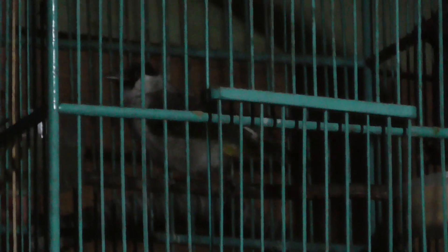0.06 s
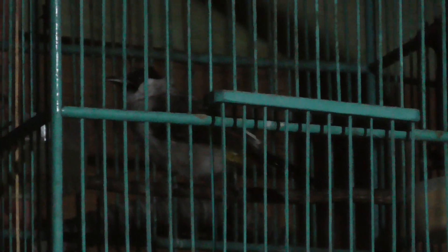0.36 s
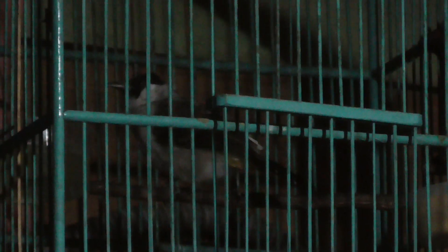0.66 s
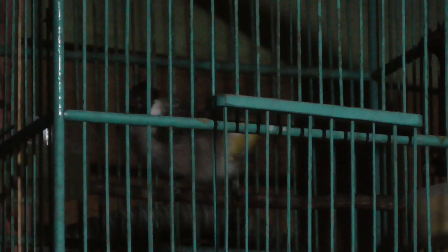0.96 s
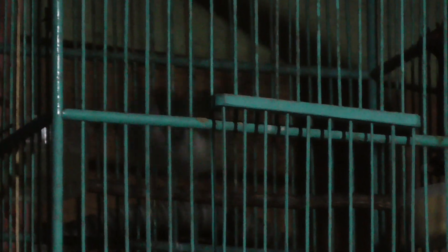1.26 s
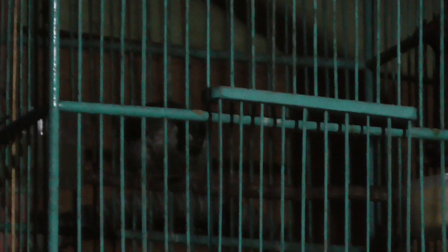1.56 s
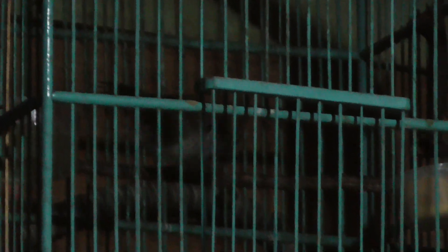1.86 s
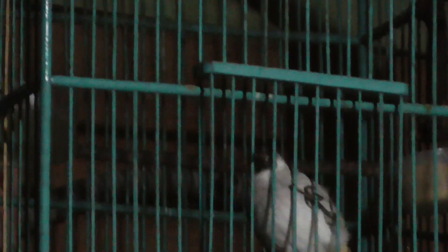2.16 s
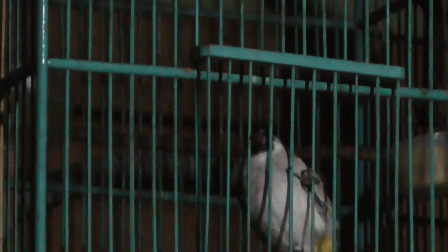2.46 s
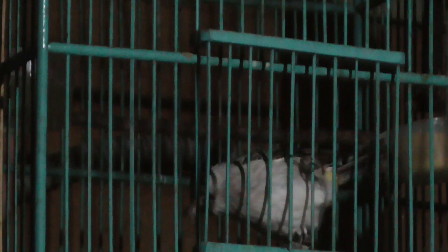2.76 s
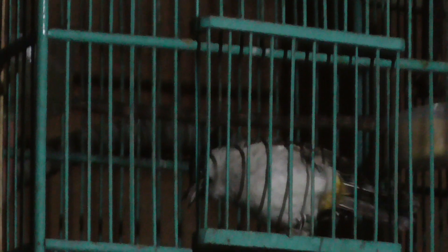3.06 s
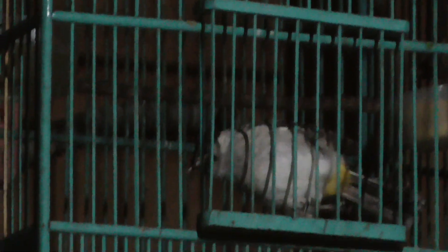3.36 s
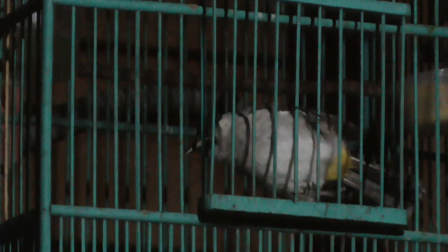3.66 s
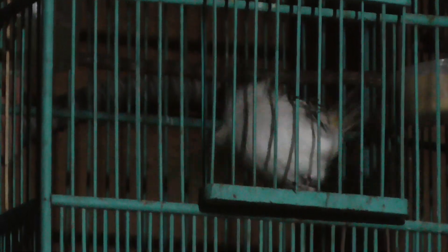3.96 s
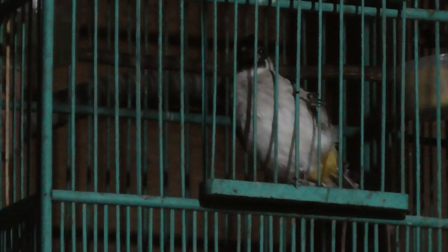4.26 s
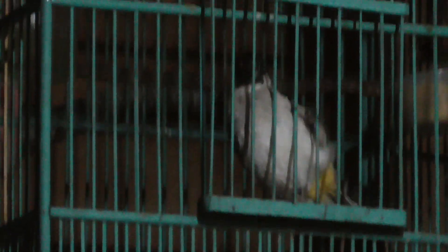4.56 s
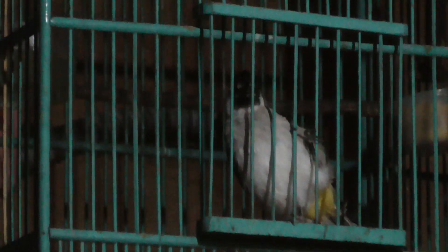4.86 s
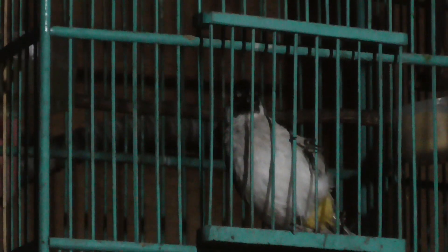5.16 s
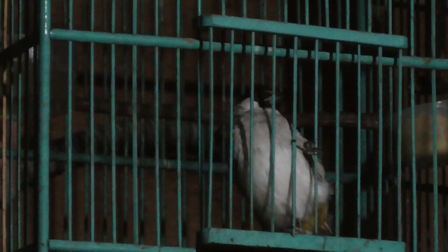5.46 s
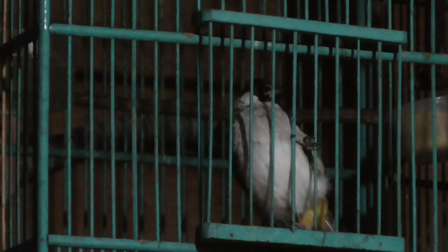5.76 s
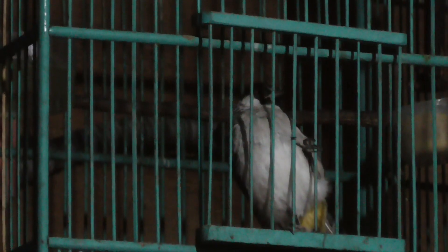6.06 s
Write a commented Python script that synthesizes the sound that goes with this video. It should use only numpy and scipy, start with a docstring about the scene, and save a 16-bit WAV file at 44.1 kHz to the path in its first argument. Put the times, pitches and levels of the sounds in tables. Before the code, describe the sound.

Sharp, raspy chirps from a bird hopping in its cage, with light bumps and faint far hoots behind.

```python
"""First comes a low room rumble with a thin hiss, then soft far hoots and a faint croaking chorus.
A claw ticks on a bar, and a caged bulbul starts to chatter in the small room at night. Each short, harsh
note is one push of air: a rasp that catches into a rising tone, shaped by the throat and beak.
The bird hops about, ticking and bumping the cage, and a few faint chirps come from farther away."""
import sys
import numpy as np
from scipy import signal
from scipy.fft import rfft, irfft, next_fast_len
from scipy.io import wavfile
from scipy.ndimage import map_coordinates

SR = 44100
rng = np.random.default_rng(int(sys.argv[2]) if len(sys.argv) > 2 else 0)


def transcribe(signal):
    """Save signal, clipped to [-1, 1], as a 16-bit WAV file at the path in sys.argv[1]."""
    frames = np.atleast_2d(signal).T
    limited = np.clip(frames, -1, 1)
    pcm = np.round(limited * 32767).astype(np.int16)
    wavfile.write(sys.argv[1], SR, pcm)


N = 269451

# The tone colour of the rumble and of the hiss. Each row: frequency in Hz, relative level in dB.
RUMBLE_COLOUR = [(20, -40), (55, -6), (105, -6), (150, -4.5), (270, -3.5), (370, -2), (480, -10),
                 (650, -12), (900, -15.5), (1500, -18.5), (2000, -27), (3000, -33)]
HISS_COLOUR = [(1500, -12.5), (2130, -7.5), (2370, 9.5), (2580, 0), (2800, -19.5), (4000, -16), (5200, -13),
               (6100, -2), (7200, -4), (7900, -13.5), (8800, -2.5), (11000, -14), (15500, -26)]
# How the deepest hum swells. Each row: time in seconds, level in dB.
HUM_LEVELS = [(0, -71), (2, -71.5), (4, -68.5), (5.2, -63), (6.1, -69.5)]
# The far hoots. Each row: start in seconds, pitch in Hz, level in dB.
HOOTS = [(.21, 387, -50), (.49, 380.6, -53), (0.593, 395, -49.5), (.885, 386, -53), (1.211, 396.4, -56),
         (1.605, 386, -51), (1.86, 396, -55.5), (2.21, 391, -50.5), (2.465, 385, -52.5),
         (3.261, 390.4, -55), (3.694, 390, -50), (4.01, 393, -54.5), (4.23, 388.3, -53.5),
         (4.871, 375.5, -55), (5.24, 383, -52), (5.362, 392.4, -54.5), (5.83, 384.4, -58.5)]
# Spells of croaking. Each row: start and end in seconds, level in dB, pitch in Hz.
CROAK_SPELLS = [(0.276, 1.158, -61.5, 669), (2.07, 2.55, -63, 632), (2.85, 3.9, -64, 640),
                (4.327, 5.338, -60.5, 680)]
# Claws on the bars. Each row: start in seconds, relative level in dB, pitch in Hz.
CLAW_TICKS = [(1.1494, -46, 4320), (1.6294, -49, 4600), (1.98, -31, 3580)]
# The bird shifts on its perch. Each row: start in seconds, relative level in dB.
PERCH_BUMPS = [(3.83, -55.5), (3.995, -46.5), (5.085, -56), (5.595, -51.5)]
# The tone colour of a bump. Each row: frequency in Hz, relative level in dB.
BUMP_COLOUR = [(20, -54), (230, -3), (600, -1), (1100, -9.5), (1600, -13), (5000, -22), (15000, -47)]
# The bird's notes. Each row: time of the peak in seconds, level in dB, top pitch in Hz,
# fade time in seconds, roughness from 0 to 1.
BIRD_NOTES = [ (1.318, -32.5, 2115, 0.019, 0.19), (1.471, -31.5, 2072, 0.017, 0.33),
              (2.138, -31, 2265, 0.013, 0.06), (2.301, -31.5, 2177, 0.014, 0.29),
              (2.526, -31, 2216, 0.011, 0.28), (2.677, -29, 2135, 0.023, 0.34),
              (2.802, -35, 1844, 0.023, 0.7), (2.959, -33, 1975, 0.025, 0.57),
              (3.169, -32, 2020, 0.02, 0.51), (3.340, -30.5, 2093, 0.032, .45),
              (4.005, -30.5, 1940, 0.02, 0.42), (4.137, -37, 1713, .014, 0.83),
              (4.313, -30, 2042, 0.028, 0.21), (4.521, -28.5, 2045, .018, 0.12),
              (4.677, -28.5, 2184, 0.021, 0.24), (4.878, -28, 2172, 0.03, 0.44),
              (5.388, -33.5, 1748, 0.014, 0.5), (5.500, -35.5, 1826, 0.015, .82),
              (5.685, -28.5, 2173, 0.026, 0.28)]
# How the throat boosts or cuts the tone. Each row: frequency in Hz, gain in dB.
THROAT_GAIN = [(1000, 2.5), (1500, -11.5), (2100, -18), (2600, -10.5), (3300, 1.5), (4300, 2.5),
               (5000, 0.5), (6000, -14.5), (6900, -16), (7700, -10.5), (8500, -14), (11000, -13),
               (15500, -41)]
# Rushing air in a 2000 Hz note. Each row: frequency in Hz, relative level in dB.
RASP_COLOUR = [(300, -32), (1100, -16), (1700, -10.5), (2750, -19), (3450, -3), (4400, 2.5), (5100, -4),
               (6000, -4.5), (7500, -14), (11000, -11.5), (15500, -25)]
# The beak is wide mid-song, then narrow. Each row: time in seconds, treble boost in dB before weighting.
BEAK_OPENING = [(1.32, 2.2), (2.14, 4.5), (2.68, 5), (3.34, 4), (4.0, 1.5), (4.14, -3), (4.52, -3.5),
                (4.68, -2.8), (5.69, -2.7)]
# Where that boost acts most. Each row: frequency in Hz, weight that multiplies the boost.
BEAK_WEIGHTS = [(1500, 0.73), (2800, 0.22), (4400, 0.16), (5300, 0.85), (6400, 1.9), (9000, 0.89),
                (13000, 1.16)]
# Faint far calls. Each row: start in seconds, length in seconds, pitch in Hz, level in dB.
FAR_CHIRPS = [(1.698, 0.15, 4800, -68), (5.937, 0.11, 5000, -64.5), (5.946, 0.057, 775, -58)]
# How long the room rings. Each row: frequency in Hz, seconds to fade by 60 dB (called t60).
ROOM_RING = [(300, 0.31), (4000, 0.24), (12000, 0.2)]
# How alike left and right are. Each row: frequency in Hz, likeness (1 means the same).
STEREO_LIKENESS = [(60, 0.92), (500, 0.31), (2000, 0.64), (4500, 0.7), (7000, 0.13), (12000, 0.077)]
# Noise with no colour. Each row: frequency in Hz, relative level in dB.
WHITE = [(100, 0), (16000, 0)]
# The tone colour of a croak at the usual pitch. Each row: frequency in Hz, relative level in dB.
CROAK_COLOUR = [(350, -120), (500, -7.5), (600, 3.5), (670, 11.5), (770, -2.5), (900, -22), (1500, -120)]
USUAL_CROAK_HZ = 668


def amp(db):
    """Turn decibels into a number to multiply by."""
    return 10 ** (np.asarray(db) / 20)


def unit(x):
    """Scale x so that its average strength (rms) is 1."""
    return x / np.sqrt(np.mean(x ** 2) + 1e-20)


def along(table, hz):
    """Read a table between its rows, on a log frequency scale."""
    freqs, values = np.transpose(table)
    return np.interp(np.log(hz + 1), np.log(freqs + 1), values)


def wobble(rate, size):
    """A smooth curve through `rate` random values a second."""
    return map_coordinates(rng.standard_normal(size + 4), [np.arange(size) * rate / SR], order=3)


def filtered(x, gain_at):
    """Multiply each frequency in x by gain_at(hz)."""
    size = x.shape[-1]
    padded = next_fast_len(size + 4096)
    return irfft(rfft(x, padded) * gain_at(np.fft.rfftfreq(padded, 1 / SR)), padded)[..., :size]


def noise(colour, size):
    """Stereo noise with a given tone colour, partly alike on the left and right."""
    def gains(hz):
        spread = np.arccos(np.clip(along(STEREO_LIKENESS, hz), -1, 1)) / 2
        return amp(along(colour, hz)) * [np.cos(spread), np.sin(spread)]
    mid, side = filtered(rng.standard_normal((2, size)), gains)
    return unit(np.array([mid + side, mid - side]))


def drone(hz, width_hz):
    """A narrow, wavering band of noise around one pitch."""
    return noise([(hz / 2, -120), (hz - width_hz, -25), (hz, 0), (hz + width_hz, -25), (hz * 2, -120)], N)


def pan(right_db):
    """Left and right gains that make the right side louder by right_db."""
    return amp(np.array([[-.5], [.5]]) * right_db)


def add(track, start_s, x):
    """Mix x into the track from start_s on."""
    i = max(round(start_s * SR), 0)
    track[:, i:i + x.shape[-1]] += x[..., :max(N - i, 0)]


def room_tone():
    """A low rumble, a dull murmur, a wavering hum and a thin, steady hiss."""
    rumble = amp(-57.5) * noise(RUMBLE_COLOUR, N) * amp(0.19 * wobble(5.56, N))
    murmur = amp(-60) * drone(358, width_hz=194) * amp(1.1 * wobble(11, N))
    hum_db = np.interp(np.arange(N) / SR, *np.transpose(HUM_LEVELS))
    hum = amp(hum_db) * drone(57, width_hz=22) + amp(-68) * drone(152.8, width_hz=14.5)
    hiss = amp(-57) * noise(HISS_COLOUR, N)
    return (rumble + murmur + hum) * pan(right_db=4.5) + hiss * pan(right_db=0.5)


def hoots(droop=0.056, waver_db=1.0, attack_s=0.015, release_s=0.059):
    """Nearly pure far hoots that swell, sink a little in pitch and fade."""
    out, t = np.zeros((2, N)), np.arange(SR // 3) / SR
    for start, hz, db in HOOTS:
        length = .15 * 2 ** ((db + 50.5) / 8.5)  # 8.5 dB louder lasts twice as long
        pitch = hz * (1 + droop * (np.exp(-2 * t / length) - .4))
        tone = np.sqrt(2) * np.sin(2 * np.pi * np.cumsum(pitch) / SR)
        swell = np.clip(t / attack_s, 0, 1) * np.clip((length - t) / release_s + .5, 0, 1)
        add(out, start, amp(db + waver_db * wobble(58, len(t))) * swell * tone)
    return out * pan(right_db=9)


def croaking(hz, croaks_per_s=11, throb_db=3.5, uneven=0.193):
    """Croaks: a narrow band of noise that throbs at a loose rate."""
    rate = croaks_per_s * (1 + uneven * wobble(8, N))
    throb = np.sin(2 * np.pi * np.cumsum(rate) / SR)
    band = noise([(f * hz / USUAL_CROAK_HZ, db) for f, db in CROAK_COLOUR], N)
    return unit(band * amp(throb_db * throb))


def chorus(fade_s=0.058, lull_db=-70.5):
    """Far croakers call in spells that swell and ebb; a few carry on in between."""
    t = np.arange(N) / SR
    out = amp(lull_db) * croaking(USUAL_CROAK_HZ)
    for start, end, db, hz in CROAK_SPELLS:
        swell = np.clip(np.minimum(t - start, end - t) / fade_s + .5, 0, 1)
        out += amp(db) * swell * croaking(hz)
    return out * pan(right_db=3)


def cage(bump_t60=0.42, bump_rise_s=0.0058, tick_t60=0.0055, tick_rise_s=0.00046):
    """The bird shifts with dull, rustling bumps, and its claws make the bars ring briefly."""
    out, t = np.zeros((2, N)), np.arange(SR // 3) / SR
    for start, db in PERCH_BUMPS:
        swell = amp(db + 4.5 - 60 * t / bump_t60) * (1 - np.exp(-t / bump_rise_s))
        add(out, start, swell * noise(BUMP_COLOUR, len(t)))
    for start, db, hz in CLAW_TICKS:
        swell = amp(db + 5 - 60 * t / tick_t60) * (1 - np.exp(-t / tick_rise_s))
        ring = swell * np.sin(2 * np.pi * hz * t)
        add(out, start, in_room(ring, tail_db=-20, near_db=-1, near_t60=0.0099))
    return out


def room_tail(size):
    """The room's lingering echo: each frequency dies away at its own speed."""
    hz, t, spectrum = signal.stft(noise(WHITE, size), SR, nperseg=256)
    fade = amp(-60 * t / along(ROOM_RING, hz)[:, None])
    _, tail = signal.istft(spectrum * fade, SR, nperseg=256)
    return unit(tail[:, :size])


def in_room(x, tail_db, near_db, near_t60):
    """Add quick echoes off the cage and near walls, and the room's tail, new for each sound."""
    size = SR // 3
    tail = room_tail(size)
    near = unit(noise(WHITE, size) * amp(-60 * np.arange(size) / SR / near_t60))
    echoes = (amp(tail_db) * tail + amp(near_db) * near) / np.sqrt(size)
    echoes[:, 0] += 1  # the sound that arrives directly
    heard = signal.fftconvolve(x[None], echoes, axes=1)
    return heard * np.linalg.norm(x) / np.linalg.norm(heard.mean(axis=0))  # same energy, spread in time


def throat_air(hz, size):
    """Air rushing through a throat that is tuned to a note of this pitch."""
    return noise([(f * (hz / 2000) ** 1.41, db) for f, db in RASP_COLOUR], size)[0]


def note(top_hz, fall_s, rough, beak_db, rise_s=.03, low_hz=1186.4, slack_hz=1870, flutter_db=2):
    """One push of air: a rasp catches into a tone that sweeps up, then holds and rattles."""
    size = SR // 5
    t = (np.arange(size) - size / 2) / SR  # zero at the note's peak
    step = lambda at_s, width_s: .5 + .5 * np.tanh((t - at_s) / width_s)  # glides from 0 to 1
    tension = step(-.7 * rise_s, .48 * rise_s)
    pitch = low_hz + (top_hz - low_hz) * tension
    jitter = 0.1253 * np.sqrt(rough) * (0.15 + 0.94 * tension ** 4) * wobble(800, size)
    phase = 2 * np.pi * np.cumsum(pitch * (1 + jitter)) / SR
    harmonics = np.arange(1, 8)[:, None]
    strengths = amp(along(THROAT_GAIN, harmonics * pitch * (1 + jitter)))  # favours the second harmonic
    tone = np.sqrt(2) * np.sum(strengths * np.sin(harmonics * phase), axis=0)
    slack_air = np.sqrt(1 - tension) * throat_air(min(slack_hz, top_hz), size)
    tight_air = np.sqrt(tension) * throat_air(top_hz, size)
    rasp = unit((slack_air + tight_air) * (1 + .5 * np.cos(phase)))  # one puff each cycle
    # air flows before the bird's membranes start to vibrate
    tone_share = (1 - rough ** (1.7 - 0.72 * tension)) * step(-.88 * rise_s, 0.012)
    voice = np.sqrt(tone_share) * tone + np.sqrt(1 - tone_share) * amp(-2) * rasp
    voice *= unit(amp(flutter_db * tension * wobble(604.8, size)))
    # the airway opens suddenly, then the pressure swells and drops
    pressure = np.exp(-np.where(t < 0, (t / (1.307 * rise_s)) ** 2, np.abs(t / fall_s) ** 2.34))
    swell = step(-1.89 * rise_s, 0.0056) * pressure
    sound = filtered(voice * swell, lambda hz: amp(beak_db * along(BEAK_WEIGHTS, hz)))
    return sound * np.linalg.norm(swell) / np.linalg.norm(sound)


def bulbul():
    """Every note passes the beak and rings through the room; the treble leans to the right."""
    out = np.zeros((2, N))
    for peak_s, db, top_hz, fall_s, rough in BIRD_NOTES:
        beak_db = np.interp(peak_s, *np.transpose(BEAK_OPENING))
        call = note(top_hz, fall_s, rough, beak_db)
        heard = in_room(call, tail_db=-2.5, near_db=-2.5, near_t60=0.078)
        add(out, peak_s - len(call) / SR / 2, amp(db) * heard)
    return filtered(out, lambda hz: pan(right_db=along([(1500, -.3), (4000, 0.5), (9000, 1.9)], hz)))


def far_chirps():
    """Thin, faint calls from farther away, each a short swell of narrow noise."""
    out, t = np.zeros((2, N)), np.arange(SR // 5) / SR
    for start, length, hz, db in FAR_CHIRPS:
        swell = np.sin(np.pi * np.clip(t / length, 0, 1))
        add(out, start, amp(db) * swell * drone(hz, width_hz=hz / 4)[:, :len(t)])
    return out


def scene():
    """The bird in its cage, with the night behind it."""
    return bulbul() + cage() + hoots() + chorus() + far_chirps() + room_tone()


def record(dry, top_hz=15650):
    """Cut away the very highest treble."""
    return filtered(dry, lambda hz: hz < top_hz)


dry = scene()
out = record(dry)
transcribe(out)
```